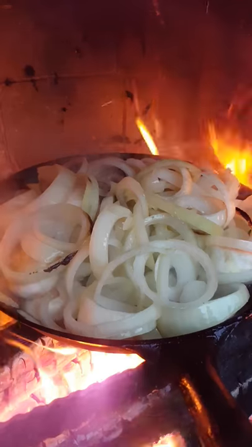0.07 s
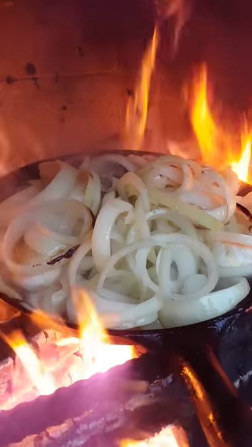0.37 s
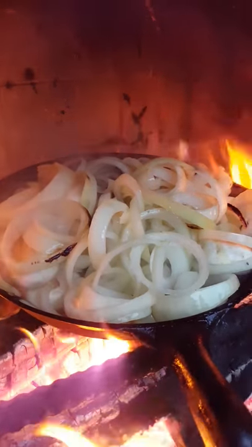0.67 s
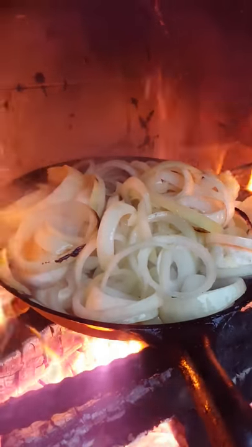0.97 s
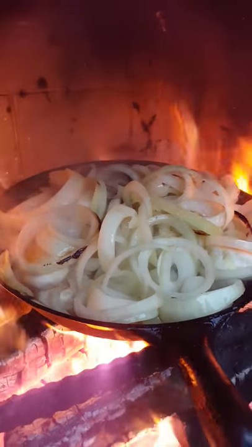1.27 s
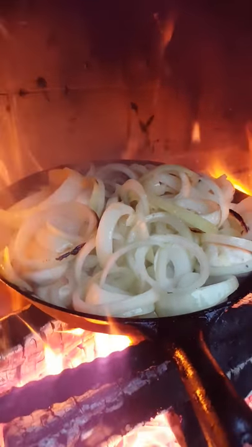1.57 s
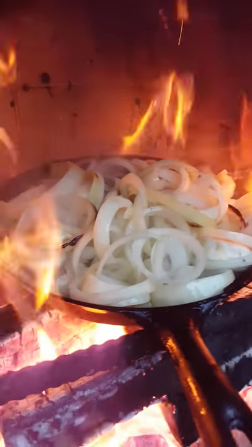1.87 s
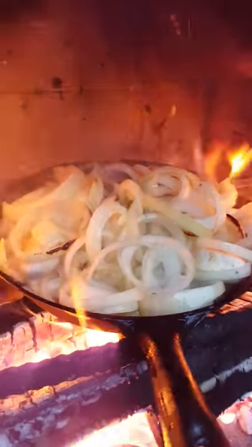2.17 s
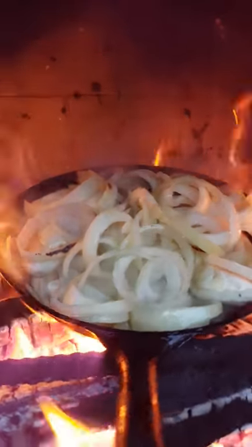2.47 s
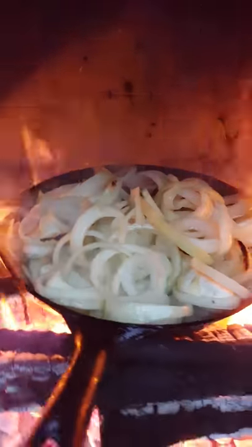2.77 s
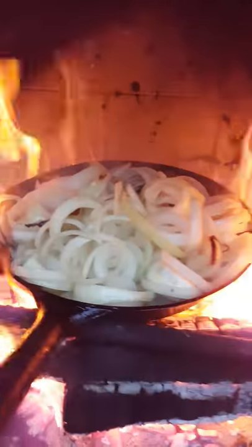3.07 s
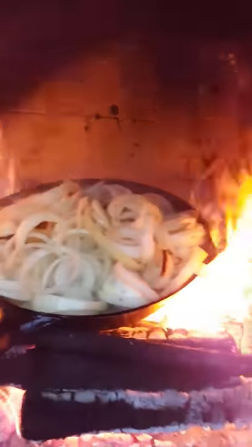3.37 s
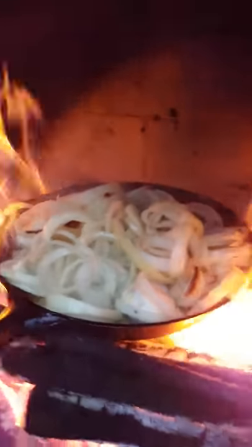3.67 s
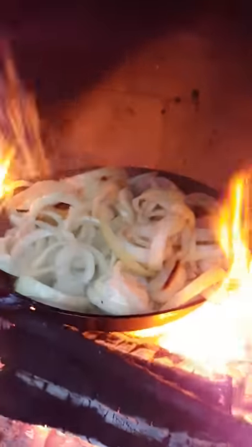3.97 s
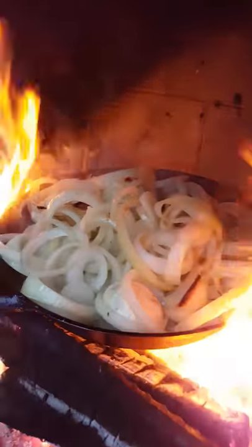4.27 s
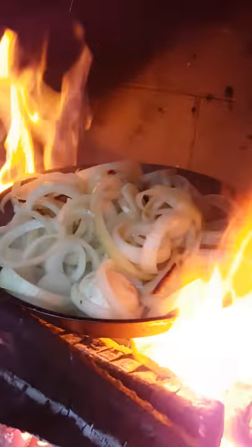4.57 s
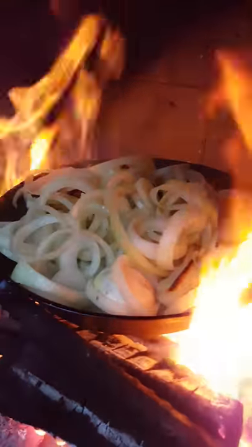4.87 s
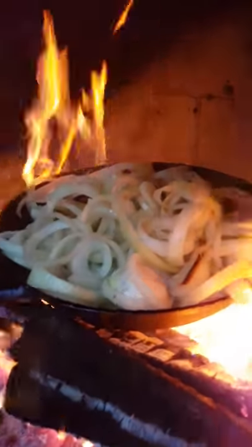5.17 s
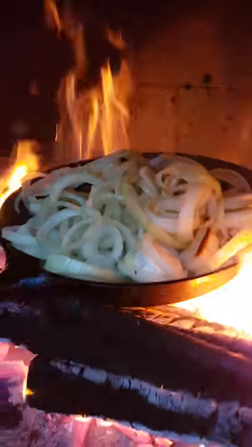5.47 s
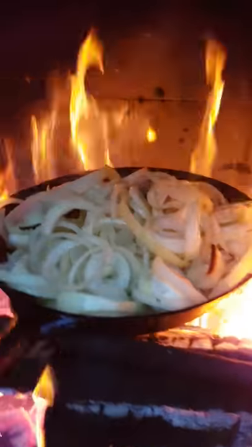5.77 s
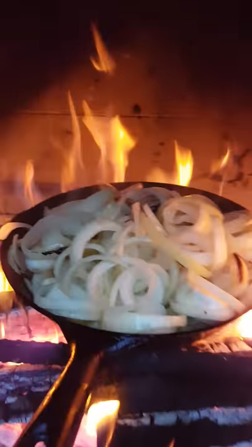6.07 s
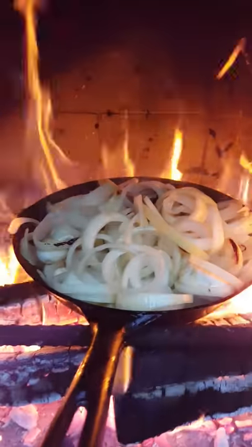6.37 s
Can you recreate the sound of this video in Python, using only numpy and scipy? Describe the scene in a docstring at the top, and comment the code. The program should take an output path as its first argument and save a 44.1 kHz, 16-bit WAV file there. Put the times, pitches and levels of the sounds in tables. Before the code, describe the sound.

Close, continuous sizzling and spitting of onions frying in a pan, while flames flutter low underneath and burning logs crack now and then.

```python
"""Sliced onions sizzle in an iron skillet over a wood fire, heard close by in a brick fireplace.
At first the pan is fierce: steam bubbles burst under the slices, oil fizzes and larger drops spit.
It soon settles to a boil with small surges, while flames rumble and logs crack now and then.
Just past three seconds the microphone moves to the side of the pan. Near the end it swings back,
and a faint low hum comes in."""
import sys
import numpy as np
from scipy import signal
from scipy.fft import rfft, irfft
from scipy.io import wavfile
from scipy.ndimage import uniform_filter1d

SR = 44100
rng = np.random.default_rng(int(sys.argv[2]) if len(sys.argv) > 2 else 0)


def store_pcm(level_fs):
    """Save levels as 16-bit WAV."""
    pcm = np.round(np.clip(level_fs, -1, 1) * 32767).astype(np.int16)
    wavfile.write(sys.argv[1], SR, np.atleast_2d(pcm).T)


N = 287973
HZ = np.fft.rfftfreq(N, 1 / SR)
TIME = np.arange(N) / SR
START_S = 0.105  # silence before the microphone opens


def amp(db):
    """Turns decibels into a number to multiply by."""
    return 10 ** (np.asarray(db) / 20)


def unit(x):
    """Scales a signal so that its average strength (rms) is one."""
    return x / np.sqrt(np.mean(x ** 2) + 1e-20)


def at_hz(rows, column=1):
    """Reads one column of a table at every frequency, on a log scale."""
    columns = np.transpose(rows)
    return np.interp(np.log(HZ + 1), np.log(columns[0]), columns[column])


def at_time(rows):
    """Reads the columns of a table at every moment."""
    times, *columns = np.transpose(rows)
    return [np.interp(TIME, times, column) for column in columns]


def band(x, lo_hz, hi_hz):
    """Keeps the sound between two frequencies."""
    below = lambda hz: 1 / (1 + (HZ / hz) ** 16)
    return irfft(rfft(x) * (below(hi_hz) - below(lo_hz)), N)


def band_at_level(x, lo_hz, hi_hz, db):
    """Keeps one band of a stereo sound and makes it follow a level curve."""
    part = band(x, lo_hz, hi_hz)
    return part * amp(db) / np.std(part.mean(0))


def drift(rate_hz):
    """A smooth random wobble, up to about the given rate."""
    noise = rfft(rng.standard_normal(N))
    return unit(irfft(noise * np.exp(-(HZ / rate_hz) ** 2) * HZ / (HZ + 5), N))


def swells(rows):
    """Adds up smooth rises and falls in dB, one curve for each level column."""
    middle, length, *columns = np.transpose(rows)
    arches = np.cos(np.pi * np.clip((TIME - middle[:, None]) / length[:, None], -.5, .5)) ** 2
    return [column @ arches for column in columns]


def settling(steady_db, extra_db, settle_s):
    """A level in dB that sinks from a fierce start to its steady value."""
    return steady_db + extra_db * np.exp(-np.maximum(TIME - START_S, 0) / settle_s)


def add(mix, start_s, sound):
    """Lays a stereo sound into the mix."""
    part = mix[:, round(start_s * SR):][:, :sound.shape[1]]
    part += sound[:, :part.shape[1]]


def brick_echo(x, echo_db, tail_s):
    """The brick walls throw back a short, dense tail, different at each microphone."""
    t = np.arange(SR // 5) / SR
    echoes = rng.standard_normal((2, len(t))) * (rng.random((2, len(t))) < .15)
    echoes *= (t > .0015) * amp(-60 * t / tail_s)
    echoes *= amp(echo_db) / np.linalg.norm(echoes, axis=1, keepdims=True)
    return x + signal.oaconvolve(x, echoes, axes=1)[:, :x.shape[1]]


def standing_waves(x, waves):
    """Sound bouncing between the walls grows louder at some pitches and softer at others."""
    change_db = sum(db * np.exp(-2 * ((HZ - hz) / width) ** 2) for hz, width, db in waves)
    return irfft(rfft(x) * amp(change_db), N)


def hum(hz=103, db=-45, start_s=5.9, rise_s=0.13):
    """A faint low hum with a slightly wobbling pitch comes in near the end."""
    cycles = np.cumsum(hz + .8 * drift(4.5)) / SR
    fade_in = np.clip((TIME - start_s) / rise_s, 0, 1)
    return amp(db) * unit(np.sin(2 * np.pi * cycles)) * fade_in


def flames(low_cut_hz=45, flutter_db=-45.5, waver_db=2):
    """Swirling flames rumble and flutter in the firebox, almost alike at both microphones."""
    # The tone of the flames in the firebox. Each row: frequency in Hz, relative level in dB.
    flame_tone = [(15, -32), (30, -9.5), (50, -2), (62, -4), (71, 5), (84, -5.5), (112, -14.5), (135, -6),
                  (150, -11.5), (172, -17), (215, -11.5), (300, -20.5), (420, -25.5), (900, -59)]
    # Gusts of draught change the flutter. Each row: middle in seconds, length in seconds, change in dB.
    gusts = [(1.0, 0.37, 1), (2.3, 0.45, 3.5), (3.15, 1, 3), (4.35, 0.41, 4), (4.82, 0.53, 6),
             (6.0, 0.51, -1), (6.42, 0.36, 2.5)]
    common, apart = rfft(rng.standard_normal((2, N))) * amp(at_hz(flame_tone))
    apart *= np.minimum(HZ / 1750, 1)  # short waves differ more between the microphones
    roar = irfft(np.array([common + apart, common - apart]), N)
    rumble = band(roar, 12, 101.5)
    rumble /= np.sqrt(abs(uniform_filter1d(rumble[0] ** 2, size=SR // 4)) + 1e-12)  # holds it steady
    low_cut = 1 / np.sqrt(1 + (low_cut_hz / (HZ + 1)) ** 5)
    rumble = irfft(rfft(rumble * amp(-40.5)) * low_cut, N)
    flutter = roar * amp(waver_db * drift(17.5))
    return rumble + band_at_level(flutter, 94.4, 1200, flutter_db + swells(gusts)[0])


def rumble_swells(swell_s=0.018):
    """The low rumble of the fire swells briefly, near 70 Hz."""
    # Brief swells of the rumble. Each row: start in seconds, peak level in dB, pitch in Hz.
    low_swells = [(0.518, -38, 70), (0.805, -30, 68), (1.315, -31, 69.4), (1.431, -36, 70),
                  (1.913, -34, 61.7), (2.681, -22.5, 78.5), (2.809, -25.5, 69.5), (3.289, -30.5, 70),
                  (3.702, -29, 67), (4.269, -34, 69), (4.901, -30, 67), (4.945, -36, 66.4),
                  (5.254, -34, 65), (5.54, -33, 68), (5.874, -31, 72.4), (6.073, -32, 78.5),
                  (6.234, -36, 65.4)]
    t, out = np.arange(SR // 4) / SR, np.zeros((2, N))
    swell = (t / swell_s * np.exp(1 - t / swell_s)) ** 2
    for start_s, db, hz in low_swells:
        add(out, start_s, amp(db) * swell * np.sin(2 * np.pi * hz * t) * np.ones((2, 1)))
    return out


def pops(rows, fade_s, width, ring_gain, ring_s, echo_db):
    """Each pop is a dying burst of noise round its pitch and the brief ring of the hollow that opens."""
    t, out = np.arange(SR // 25) / SR, np.zeros((2, N))
    hz = np.fft.rfftfreq(len(t), 1 / SR) + 1
    for start_s, db, pitch_hz, left_db in rows:
        resonance = 1 / (1 + 1j * (hz / pitch_hz - pitch_hz / hz) / width)
        noise = rng.standard_normal((2, len(t))) * np.exp(-t / fade_s)
        burst = irfft(rfft(noise) * resonance ** 2, len(t))
        ring = np.sin(2 * np.pi * pitch_hz * t) * t / ring_s * np.exp(1 - t / ring_s)
        pop = burst / abs(burst).max(1, keepdims=True) + ring_gain * ring
        add(out, start_s, pop * amp(db + np.array([[left_db], [-left_db]]) / 2))
    return brick_echo(out, echo_db, tail_s=0.069)


def log_cracks():
    """The burning logs crack, with little ring or echo."""
    # The cracks. Each row: start in seconds, level in dB, pitch in Hz, left over right in dB.
    cracks = [(0.512, -14, 1800, 3), (0.868, -9, 1390, 3), (0.982, -10.5, 1610, 1), (3.435, -22, 850, 3),
              (4.791, -24, 850, -1), (6.388, -15, 1500, 6)]
    return pops(cracks, fade_s=0.004, width=1.05, ring_gain=0.056, ring_s=0.00015, echo_db=-19)


def oil_spits():
    """Larger drops spit in the hot oil."""
    # The drops. Each row: start in seconds, level before echo in dB, pitch in Hz, left over right in dB.
    drops = [(0.1458, -22, 2700, 6), (0.2764, -15, 2880, 10), (0.3574, -14.5, 3370, 9),
             (0.4574, -19, 2360, -1), (0.5521, -18, 3220, 5), (0.5967, -15.5, 2070, 3),
             (0.9594, -11.5, 2080, 9), (1.3254, -14, 3220, 3), (2.0455, -17, 4200, 2),
             (2.2874, -16.5, 3760, 8), (2.6444, -12, 2470, 1), (2.8964, -17, 2550, 1),
             (3.4072, -13, 3200, 3), (3.5977, -17, 3600, 7), (3.8197, -16, 3100, 3), (4.0861, -11, 3150, 1),
             (4.3655, -13.5, 2230, -1), (4.6169, -16, 3940, 6), (5.2844, -14.5, 3320, 3),
             (5.8391, -15, 3340, 2), (6.2334, -14, 3890, -3)]
    return pops(drops, fade_s=0.002, width=0.76, ring_gain=0.39, ring_s=0.0014, echo_db=2.0)


def bursts(per_s, lo_hz, hi_hz, patches, ring_cycles, snap_gain, snap_s, spread_db, flurry_db,
           echo_db, tail_s):
    """Bubbles burst in flurries on each patch of the pan; each one snaps and its hollow rings briefly."""
    t, out = np.arange(SR // 100) / SR, np.zeros((2, N))
    for hz in np.geomspace(lo_hz, hi_hz, patches):
        flurry = np.interp(TIME, np.arange(0, 7, .025), rng.standard_normal(280))
        size_db = spread_db * np.minimum(rng.exponential(1, N), 4) + flurry_db * flurry
        clicks = amp(size_db) * (rng.random(N) < per_s / patches / SR) * rng.choice([-1, 1], N)
        ring = np.sin(2 * np.pi * (hz * t + rng.random((2, 1)))) * np.exp(-t * hz / ring_cycles)
        snap = rng.standard_normal((2, len(t))) * np.exp(-t / snap_s)
        bubble = unit(ring) + snap_gain * unit(snap)
        patch = signal.oaconvolve(clicks[None], bubble, axes=1)[:, :N]
        out += brick_echo(patch, echo_db, tail_s)
    return unit(out)


def pan_at_microphones(x):
    """Gives the bursts the tone of the pan, partly alike at two close microphones."""
    # The tone of the sizzle. Each row: frequency in Hz, then relative left and right levels in dB.
    pan_tone = [(201, -45, -28), (437, -19, -20), (546, -15.5, -16.5), (723, -11.5, -14.5),
                (850, -7, -14.5), (1115, -6.5, -9.5), (1510, -1.5, -3), (1750, -3.5, -5.5), (2700, 0.9, -1),
                (3760, -0.8, -3), (5080, -6.5, -5), (5350, -7, -11), (6370, -5.5, -7.5), (7360, -9, -15),
                (9000, -11.5, -10.5), (10050, -14.5, -13.5), (11300, -9, -11.5), (12400, -9, -14),
                (15600, -5.5, -15)]
    # How alike the two sides sound. Each row: frequency in Hz, likeness from 0 to 1.
    likeness = [(300, 0.91), (600, 0.86), (780, 0.53), (1000, 0.38), (3500, 0.45), (6000, 0.016),
                (12000, 0)]
    # How far the left wave runs ahead of the right. Each row: frequency in Hz, lead in radians.
    left_lead = [(300, 1.3), (550, 0.2), (760, 1.15), (980, -1.1), (1250, 1.57), (1550, -1.93),
                 (1900, 0.74), (3700, 1.18)]
    spectrum = rfft(x)
    power = abs(uniform_filter1d(abs(spectrum) ** 2, 401, axis=1))
    left, other = spectrum / np.sqrt(power + 1e-12)  # evens out the tone before shaping it
    same = at_hz(likeness)
    right = same * left * np.exp(-1j * at_hz(left_lead)) + np.sqrt(1 - same ** 2) * other
    return irfft([left * amp(at_hz(pan_tone, column=1)), right * amp(at_hz(pan_tone, column=2))], N)


def sizzle():
    """Steam bubbles burst under the onions and finer ones fizz in the oil, settling and surging."""
    # Juice runs onto the hot iron and the boil surges.
    # Each row: middle in seconds, length in seconds, bubble change in dB, fizz change in dB.
    surges = [(0.32, 0.2, 1.0, 0), (0.6, 0.091, 1.3, 0.3), (0.95, 0.11, 0.9, 0.2), (1.32, 0.14, 0.5, -1),
              (1.6, 0.18, 1.2, 0.6), (2.42, 0.73, 0.3, 1.5), (2.68, 0.36, 1.2, 0.5), (2.9, 0.18, 1, 0.8),
              (3.22, 0.12, 0.5, 0), (4.13, 0.27, 1, 1.5), (4.32, 0.59, 1.5, 0.3), (5.27, 0.14, 0.5, 0.9),
              (5.92, 0.45, 0.5, 2.4), (6.24, 0.14, 0.7, -1), (6.42, 0.25, 0.6, -2)]
    # The microphone's path round the pan.
    # Each row: time in seconds, turn from front (0) to side (1), fizz left over right in dB.
    path = [(0.1, 0.1, 2.5), (2.2, 0.093, 1.5), (3.3, 0.069, 0), (3.95, 0.94, 1), (5.45, 1, 2),
            (5.95, 0.34, 1), (6.5, 0.02, -4)]
    # Standing waves of the firebox, from the front and from the side.
    # Each row: frequency in Hz, width in Hz, change in dB.
    front_waves = [(435, 150, -3), (537, 49, 7), (733, 48, 5), (1327, 80, 4.5), (1670, 130, -0.6),
                   (1940, 89, 3), (2920, 120, 2), (3500, 910, 0)]
    side_waves = [(593, 140, -5.5), (965, 36, 4), (1193, 73, 5.5), (2140, 150, 2), (3760, 760, -1.5)]
    bubbles = bursts(per_s=4400, lo_hz=896, hi_hz=5036, patches=20, ring_cycles=3.15, snap_gain=0.7,
                     snap_s=0.00044, spread_db=2.5, flurry_db=1.4, echo_db=-1.5, tail_s=0.076)
    fizz = bursts(per_s=6500, lo_hz=5566, hi_hz=15200, patches=14, ring_cycles=5.1, snap_gain=0.96,
                  snap_s=0.00078, spread_db=2.0, flurry_db=2.5, echo_db=-1.0, tail_s=0.045)
    frying = pan_at_microphones(bubbles + amp(0.5) * fizz) * amp(0.33 * drift(18))
    turn, left_db = at_time(path)
    frying = (1 - turn) * standing_waves(frying, front_waves) + turn * standing_waves(frying, side_waves)
    bubble_surge, fizz_surge = swells(surges)
    bubble_db = settling(steady_db=-26, extra_db=3, settle_s=0.4) + bubble_surge
    fizz_db = settling(steady_db=-33.5, extra_db=6.1, settle_s=0.82) + fizz_surge
    sides_db = np.array([left_db, -left_db]) / 2
    body = band_at_level(frying, 100, 11300, bubble_db) * amp(0.17 * sides_db)  # shifts sideways less
    finest_fizz = band_at_level(frying, 11080, 17900, fizz_db) * amp(sides_db)
    return body + finest_fizz


def scene():
    """The pan, the fire and the hum together."""
    return oil_spits() + log_cracks() + sizzle() + flames() + rumble_swells() + hum()


def record(dry):
    """The microphone opens after a moment, and the very highest treble is cut away."""
    opened = dry * np.clip((TIME - START_S) / .002, 0, 1)
    treble_cut = signal.firwin(1023, cutoff=15850, window=("kaiser", 9), fs=SR)
    return signal.oaconvolve(opened, treble_cut[None], "same")


dry = scene()
out = record(dry)
store_pcm(out)
```